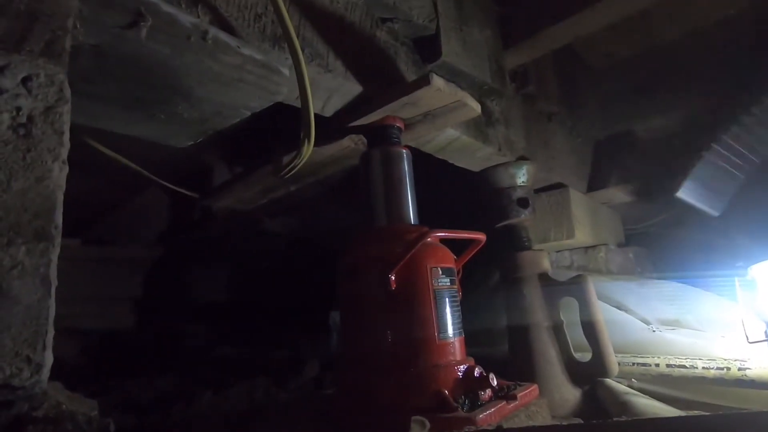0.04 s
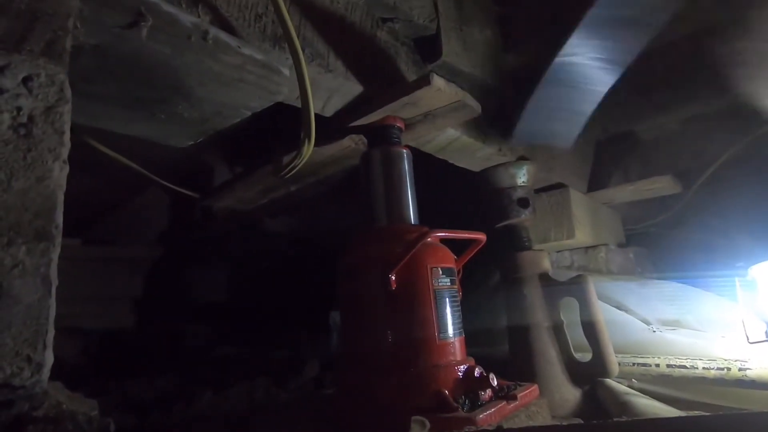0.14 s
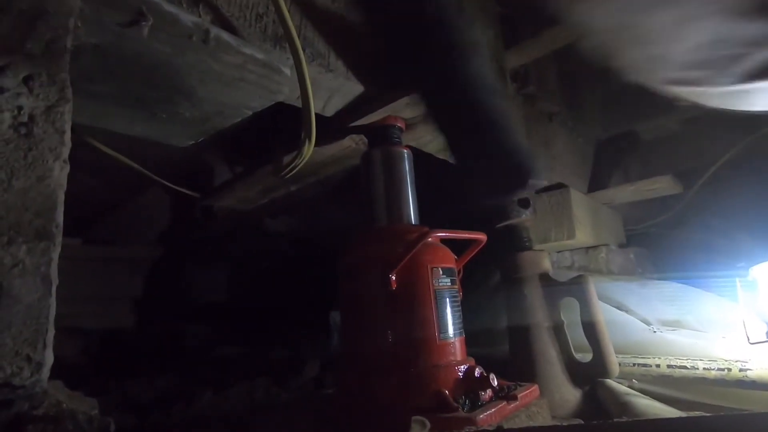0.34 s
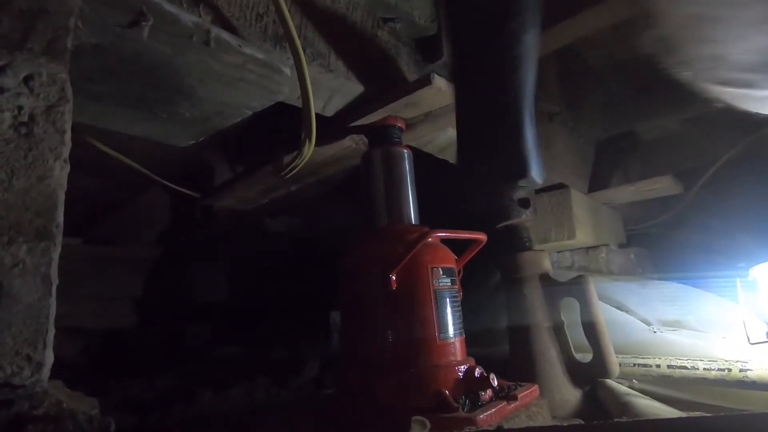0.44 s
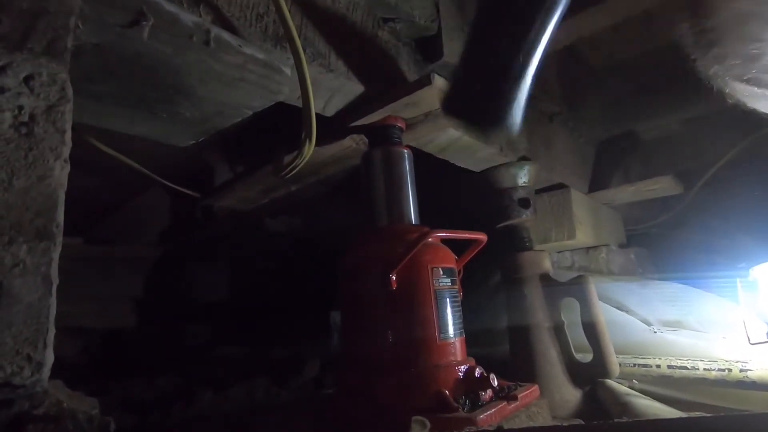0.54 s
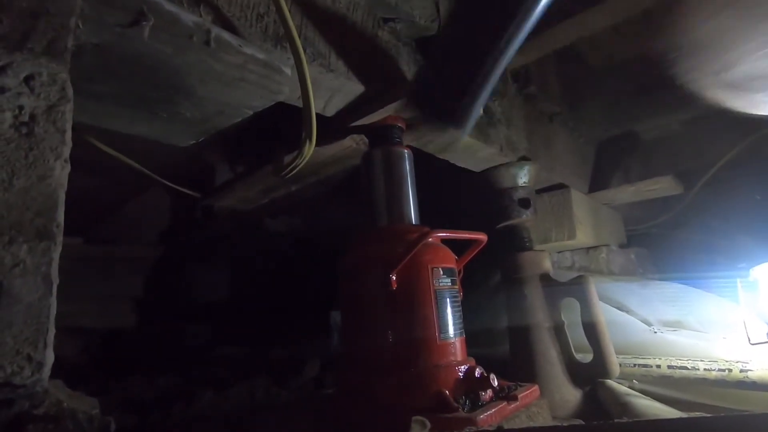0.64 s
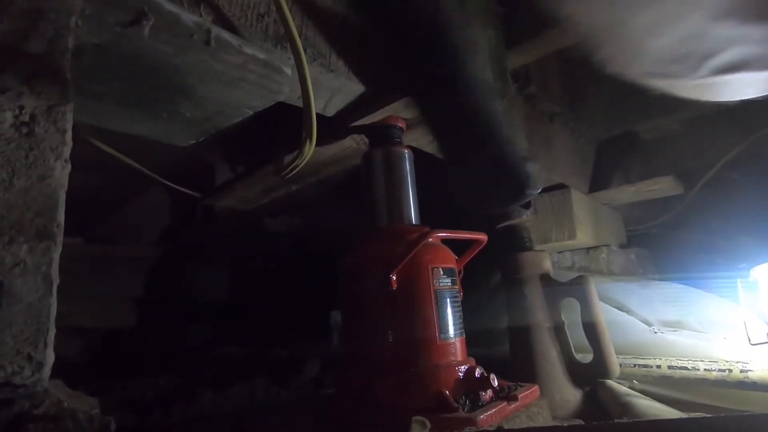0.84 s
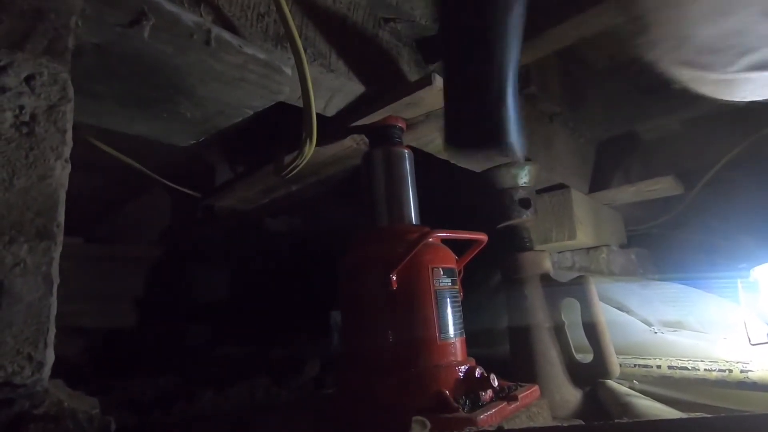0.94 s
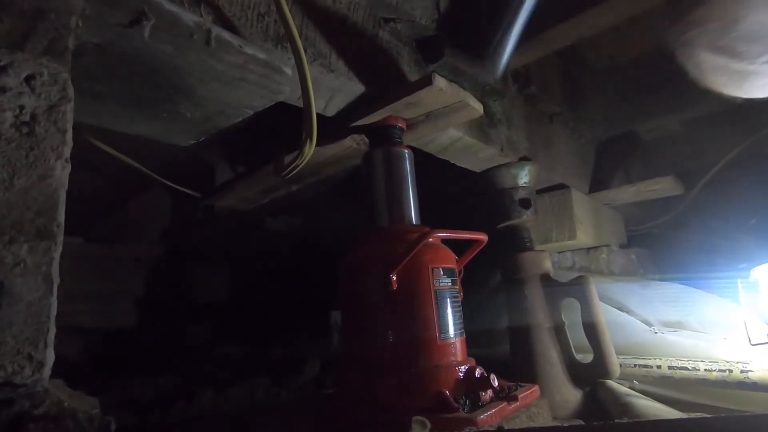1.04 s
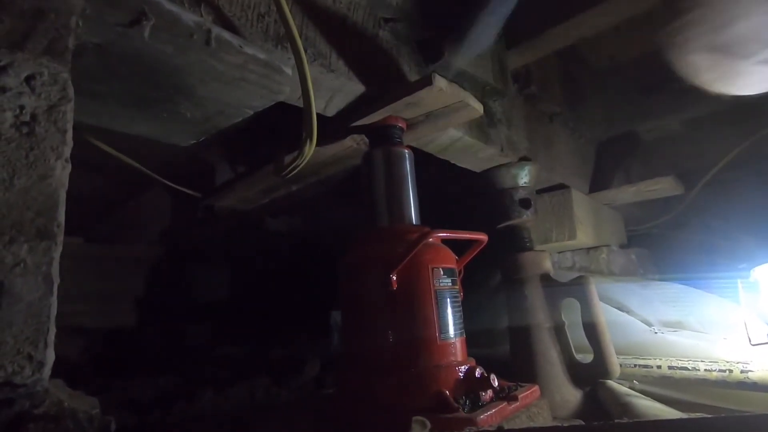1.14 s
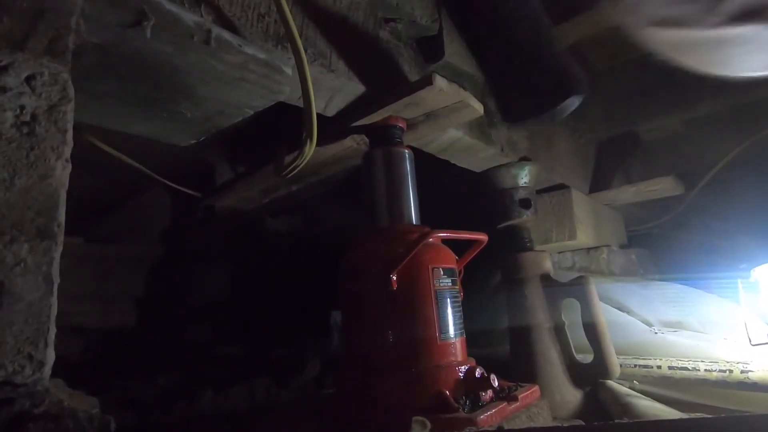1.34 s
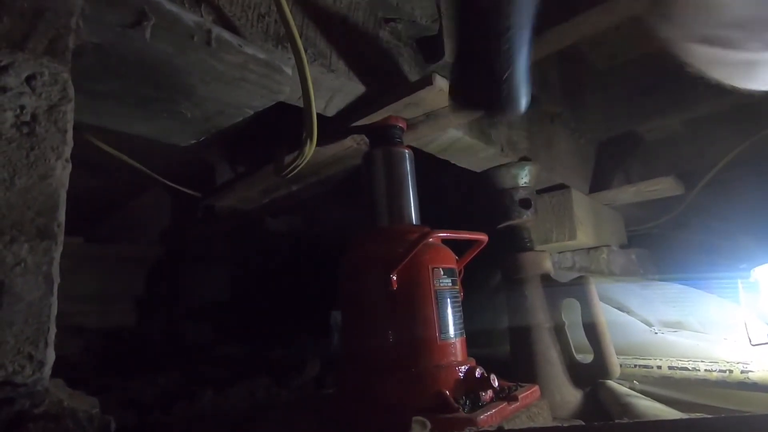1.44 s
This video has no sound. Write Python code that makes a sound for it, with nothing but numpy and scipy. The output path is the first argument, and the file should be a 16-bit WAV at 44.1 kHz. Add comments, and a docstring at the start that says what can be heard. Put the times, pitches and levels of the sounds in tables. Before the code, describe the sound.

Three loud, evenly paced hammer blows land on wooden beams under a floor, heard up close. A quick metallic scrape leads into each crack and hollow thud, with faint sleeve rustle and a low hum between them.

```python
"""Three blows under a wooden floor

A heavy hand tool is swung three times against the timber beside a jack. Each stroke scrapes along
steel with a swelling ring, lands with a crack and booms through the joists and the crawl space.
Between strokes a sleeve rustles and the tool rubs and ticks faintly; a motor hums behind.
An automatic gain control ducks at the first blow and stays down."""
import sys
import numpy as np
from scipy import signal
from scipy.fft import rfft, irfft, next_fast_len
from scipy.io import wavfile
from scipy.ndimage import uniform_filter1d, minimum_filter1d, map_coordinates

SR = 44100
rng = np.random.default_rng(int(sys.argv[2]) if len(sys.argv) > 2 else 0)


def log_audio(samples):
    """Write samples as a 16-bit WAV file to the path given in sys.argv[1]."""
    # one column per channel
    frames = np.atleast_2d(samples).T
    # limit to full scale, then quantise
    limited = np.clip(frames, -1, 1)
    pcm = np.round(limited * 32767).astype(np.int16)
    wavfile.write(sys.argv[1], SR, pcm)


N = 66150
CRACK_LEAD_S = .0042  # the contact cracks this long before the timbers boom


def amp(db):
    """Decibels to amplitude ratio."""
    return 10 ** (np.asarray(db) / 20)


def unit(x):
    """Normalise to rms 1."""
    return x / np.sqrt(np.mean(x ** 2) + 1e-20)


def since(start_s):
    """Seconds since start_s, for every sample."""
    return np.arange(N) / SR - start_s


def along(points, hz):
    """Interpolate (frequency_hz, value) points on a logarithmic frequency axis."""
    knots_hz, values = np.transpose(points)
    return np.interp(np.log(hz + 1), np.log(knots_hz + 1), values)


def filtered(x, response):
    """Linear filtering: multiply the spectrum by a frequency response."""
    size = next_fast_len(N + SR // 2)
    return irfft(rfft(x, size) * response(np.fft.rfftfreq(size, 1 / SR)), size)[..., :N]


def noise(spectrum):
    """Spectral shaping: white noise coloured by (frequency_hz, density_db) points, at rms 1."""
    return unit(filtered(rng.standard_normal(N), lambda hz: amp(along(spectrum, hz))))


def wobble(rate_hz):
    """Random modulation: a smooth curve through rate_hz random knots a second."""
    at = np.arange(0, N * rate_hz / SR + 1, 1 / 8)
    return np.interp(since(0) * rate_hz, at, map_coordinates(rng.standard_normal(N // 32), [at]))


def decay(t, t60_s):
    """Damping: a sudden start at t = 0, then an exponential fall of 60 dB in t60_s."""
    return (t >= 0) * amp(-60 * np.maximum(t, 0) / t60_s)


def noise_band(hz, width_hz):
    """A resonance driven at random by friction gives a narrow band of noise."""
    phase = 2 * np.pi * hz * since(0)
    return wobble(width_hz) * np.sin(phase) + wobble(width_hz) * np.cos(phase)


def motor(fundamental_hz=59.66):
    """Periodic vibration gives a harmonic hum, here wavering slightly over a low rumble."""
    # partials of the hum: harmonic_number, level_db
    harmonics = [(1, -33), (2, -37.5), (3, -47.5), (4, -47.5), (5, -57.5), (6, -60.5), (7, -68)]
    # rumble spectrum: frequency_hz, density_db
    rumble = [(20, -10), (45, -2.5), (100, 2), (200, -3.5), (320, -7.5), (550, -26.5), (1000, -37.5),
              (3000, -33), (6000, -46), (15000, -63)]
    hum = np.zeros(N)
    for number, db in harmonics:
        peak = np.sqrt(2) * amp(db + 2.4 * wobble(18))
        hum += peak * np.sin(2 * np.pi * (number * fundamental_hz * since(0) + rng.random()))
    return hum + amp(-43.5) * noise(rumble)


def handling(tick_width_s=.0048):
    """Cloth friction gives soft swells of noise; the tool ticks once as it is drawn back."""
    # movements of arm and sleeve: centre_s, width_s, level_db
    rustles = [(0.031, 0.055, -63), (.13, .025, -55.5), (.6, .02, -51.5), (.86, 0.13, -63.5),
               (1.081, 0.23, -59.5)]
    # sleeve spectrum: frequency_hz, density_db
    sleeve_spectrum = [(200, -10.5), (750, 6.5), (1050, 0), (1450, 2.5), (2000, -2.5), (2800, 0.5),
                       (3500, -3.5), (4900, -5.5), (6300, -25), (9000, -21.5), (15000, -46.5)]
    # light contact of the tool: centre_s, level_db
    ticks = [(.971, -34)]
    # tick spectrum: frequency_hz, density_db
    tick_spectrum = [(200, 4), (1000, -1), (2200, 5.5), (4000, 2.5), (6000, -12.5), (7700, -7.5),
                     (11000, -22.5), (15000, -32)]
    swells = sum(amp(db) * np.exp(-.5 * (since(s) / width_s) ** 2) for s, width_s, db in rustles)
    spike = sum(amp(db) * np.exp(-abs(since(s)) / tick_width_s) for s, db in ticks)
    return swells * amp(1.5 * wobble(75)) * noise(sleeve_spectrum) + spike * noise(tick_spectrum)


def draw_back():
    """Light friction sustains a few steel resonances as the tool is drawn back."""
    # envelope of the rubbing: time_s, level_db
    envelope = [(.55, -93.5), (.63, -57), (.8, -65.5), (.88, -53.5), (1.14, -52), (1.2, -94.5)]
    # steel resonances: pitch_hz, width_hz, relative_db
    resonances = [(790, 100, -7), (1390, 80, -0.5), (1604, 110, -8), (2650, 500, 0), (2880, 120, -2.5)]
    whine = sum(amp(db) * noise_band(hz, width_hz) for hz, width_hz, db in resonances)
    return amp(np.interp(since(0), *np.transpose(envelope))) * unit(whine)


def crawl_space(start_s):
    """Reverberation: dense reflections off joists and soil lose treble first and leave a dull tail."""
    # spectrum of the close reflections: frequency_hz, density_db
    close_spectrum = [(60, -26.5), (200, 1.5), (450, 9.5), (800, 0), (1300, 1.5), (1900, 3), (2500, 1),
                      (3400, -5.5), (4800, -6), (6000, -21), (8500, -22.5), (10600, -32), (12000, -43),
                      (15000, -52)]
    # their decay times: frequency_hz, t60_s
    close_t60 = [(200, .13), (600, 0.14), (1500, .08), (4000, .08), (10000, 0.049)]
    # spectrum of the late reverberation: frequency_hz, density_db
    tail_spectrum = [(25, -7.5), (50, -0.5), (90, -2.5), (140, 11.5), (250, -2.5), (450, -17.5),
                     (800, -25.5), (2000, -30.5), (3300, -37.5), (6000, -58), (15000, -67)]
    t = since(start_s)
    hz, frame_s, bands = signal.stft(noise(close_spectrum), SR, nperseg=256)
    damping = decay(np.maximum(frame_s - start_s, 0), along(close_t60, hz)[:, None])
    close = signal.istft(bands * damping, SR, nperseg=256)[1][:N]
    onset = np.clip(t / .00033, 0, 1)
    tail = decay(t, t60_s=.49) * noise(tail_spectrum)
    return amp(-20) * onset * close + amp(-29) * tail


def scrape(land_s, steel_modes, level_db, rise_db_per_s, hold_s, slide_s=.048, stop_t60_s=.007):
    """Sliding friction drives the modes of the steel ever harder until the tool lands."""
    # broad rubbing noise: frequency_hz, density_db
    grit = [(100, -8), (500, 3), (900, -7), (1500, 1), (1950, -6.5), (2800, 0.5), (4000, -4.5), (5200, -6),
            (6500, -21), (8200, -16), (9600, -28.5), (10600, -23), (12000, -37.5), (15000, -48.5)]
    # the timber grumbling under the scrape: frequency_hz, density_db
    grumble = [(60, -20), (200, 3), (420, 2.5), (750, -1.5), (900, -12), (1080, -2), (1250, -13.5),
               (2000, -42.5)]
    t = since(land_s)
    ring = np.zeros(N)
    for hz, db in steel_modes:
        tone = np.sin(2 * np.pi * (hz * t + rng.random()) + .35 * wobble(60))
        roughness = amp(1.5 * wobble(90))
        skirt = amp(-16) * noise_band(hz, width_hz=380)  # friction broadens each resonance
        ring += amp(db) * (roughness * tone + skirt)
    swell_db = level_db - rise_db_per_s * np.maximum(-t - hold_s, 0)
    stop = decay(np.maximum(t, 0), stop_t60_s)
    catch = np.clip((t + slide_s) / .009, 0, 1) ** 2  # the surfaces engage over 9 ms
    rubbing = amp(-19.5) * noise(grit) + amp(-13.5) * noise(grumble)
    flicker = amp(2 * wobble(300))
    return catch * amp(swell_db) * stop * (unit(ring) + rubbing) * flicker


def crack(start_s, attack_s=.0016, hold_s=.003):
    """Wood crushed for a few milliseconds radiates a broadband transient."""
    # spectrum of the splintery contact: frequency_hz, density_db
    spectrum = [(60, -44.5), (130, -25.5), (280, 1.5), (450, 2), (800, -5.5), (1200, 1.5), (1900, -5),
                (2400, 2), (3300, 0), (3800, -8), (4600, -5.5), (6000, -21.5), (8500, -27.5),
                (11000, -39.5), (15000, -53.5)]
    t = since(start_s)
    envelope = np.clip(t / attack_s, 0, 1) * decay(np.maximum(t - hold_s, 0), t60_s=.025)
    return amp(-11.5) * envelope * noise(spectrum)


def thump(start_s, pitch_ratio, dull_db_per_octave, attack_s=.00051, pivot_hz=200):
    """An impact excites the damped modes of the floor timbers, which radiate little deep bass."""
    # timber modes: pitch_hz, relative_db, t60_s
    modes = [(120, -33, 0.48), (147.5, -27.5, 0.36), (165.2, -23, 0.21), (187.54, -9.5, .155),
             (203.5, -18, 0.076), (215, -22.5, 0.2), (240, -9.5, .129), (281, -12.5, .096),
             (295.7, -29, 0.26), (326.2, -18, 0.13), (388, -18.5, .05), (426, -14.5, 0.024),
             (635, -24.5, 0.037)]
    t = since(start_s)
    ring = np.zeros(N)
    for hz, db, t60_s in modes:
        mode_db = db - dull_db_per_octave * np.log2(hz / pivot_hz) - 2.4 * rng.standard_normal()
        ring += amp(mode_db) * decay(t, t60_s) * np.sin(2 * np.pi * hz * pitch_ratio * t)
    ring *= 1 - np.exp(-np.maximum(t, 0) / attack_s)

    def floor_response(hz, echo_s=.0882, echo_top_hz=200, cut_hz=119):
        """A dull reflection from the far side of the floor, and a third-order high-pass."""
        echo = amp(-18) * np.exp(-2j * np.pi * hz * echo_s) / (1 + 1j * hz / echo_top_hz) ** 2
        low_cut = hz ** 2 / (hz ** 2 - cut_hz ** 2 - 1j * hz * cut_hz) * hz / (hz - 1j * cut_hz)
        return (1 + echo) * low_cut

    return filtered(ring, floor_response)


def strokes():
    """Friction, then impact: each swing scrapes the steel, strikes the timber and excites the space."""
    # blows: start_s, thump_gain_db, crack_gain_db, pitch_ratio, dull_db_per_octave
    blows = [(0.2376, 12.5, 12, 1.0, -1.5), (0.7018, 11.5, 12.5, 0.98, -1.3), (1.2084, 12.5, 16, 1, 8)]
    # the scrape before each blow: level_db, rise_db_per_s, hold_s
    slides = [(-15, 2297, .02), (-5.5, 1149, .003), (-4.5, 1298, 0.0082)]
    # steel modes at each stroke's point of contact: pitch_hz, relative_db
    steel_1 = [(425, -14), (1351, -17), (1456, 0.5), (1545, 0), (1647, -6), (2575, -15.5), (2675, -12),
               (2855, -6), (2958, -11.5), (3141, -18), (3238, -15.5), (3515, -14), (3983, -12), (4177, -22),
               (4828, -13.5), (5200, -22), (5299, -24), (7641, -30), (8015, -26.5), (8109, -31.5),
               (8858, -32), (10360, -43.5), (10833, -45), (11208, -48)]
    steel_2 = [(700, -10.5), (795, -12.5), (1356, -2.5), (1453, -3), (1555, -11.5), (2040, -19),
               (2300, -13), (2392, -10), (2769, -13.5), (2952, -5), (3055, -7), (3606, -11.5),
               (3709, -11.5), (4734, -9), (4823, -12.5), (5176, -15), (5318, -14.5), (6139, -16.5),
               (6239, -21), (6699, -26.5), (7170, -17), (8015, -23.5), (8109, -23.5), (8955, -28.5),
               (9046, -28.5), (10077, -34)]
    steel_3 = [(705, -6), (1550, -2), (1641, -1.5), (2295, 1.5), (2858, -2.5), (3606, -8), (3889, -9.5),
               (3986, -14.5), (4920, -11.5), (5108, -7.5), (5205, -10), (5299, -8.5), (5391, -20),
               (6045, -16), (6328, -24.5), (7450, -35), (7547, -24.5), (7830, -21), (8018, -25.5),
               (8389, -29.5), (8855, -34), (8955, -28), (9049, -28), (10637, -33.5)]
    out = np.zeros(N)
    for blow, steel_modes, slide in zip(blows, (steel_1, steel_2, steel_3), slides):
        start_s, thump_db, crack_db, pitch_ratio, dull_db_per_octave = blow
        land_s = start_s - CRACK_LEAD_S
        out += scrape(land_s, steel_modes, *slide)
        out += amp(thump_db) * thump(start_s, pitch_ratio, dull_db_per_octave)
        out += amp(crack_db) * (crack(land_s) + crawl_space(land_s + CRACK_LEAD_S / 2))
    return out


def scene():
    """Superposition, nearly mono: a quadrature side signal parts the channels' phase in the treble."""
    # stereo width: frequency_hz, side_over_mid_db
    width = [(250, -86.5), (700, -49), (1400, -34), (2800, -25), (5600, -21), (10000, -15.5), (14000, -5.5)]
    fade_in = np.clip(since(0) / .006, 0, 1)
    mid = (strokes() + handling() + draw_back() + motor()) * fade_in
    side = filtered(mid, lambda hz: 1j * amp(along(width, hz)))
    return np.array([mid + side, mid - side])


def record(dry):
    """Automatic gain control ducks on loud sound and keeps sinking; a limiter and a low-pass follow."""
    ceiling_db, drift_db_per_s, detect_s, ahead_s = -3, -1.5, .0025, .0046
    peak_limit, top_hz = .97, 15750
    power = np.abs(uniform_filter1d(dry.mean(0) ** 2, int(detect_s * SR)))
    needed_db = np.minimum(ceiling_db - 10 * np.log10(power + 1e-12), 0)
    drift_db = drift_db_per_s * since(0)
    held_db = np.minimum.accumulate(needed_db - drift_db) + drift_db
    ahead = int(ahead_s * SR)
    gain_db = minimum_filter1d(held_db, 2 * ahead)
    ducked = dry * amp(uniform_filter1d(gain_db, ahead // 2 + 1))
    limiter_gain = peak_limit / np.maximum(np.abs(ducked).max(0), peak_limit)
    limited = ducked * uniform_filter1d(minimum_filter1d(limiter_gain, size=65), size=65)
    return filtered(limited, lambda hz: hz < top_hz)


dry = scene()
out = record(dry)
log_audio(out)
```